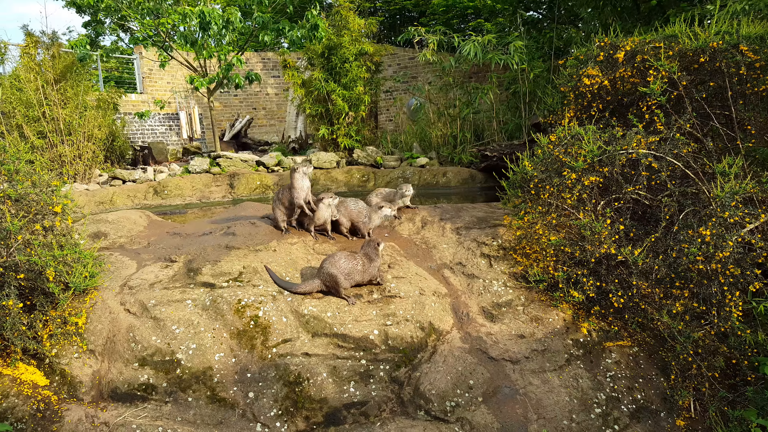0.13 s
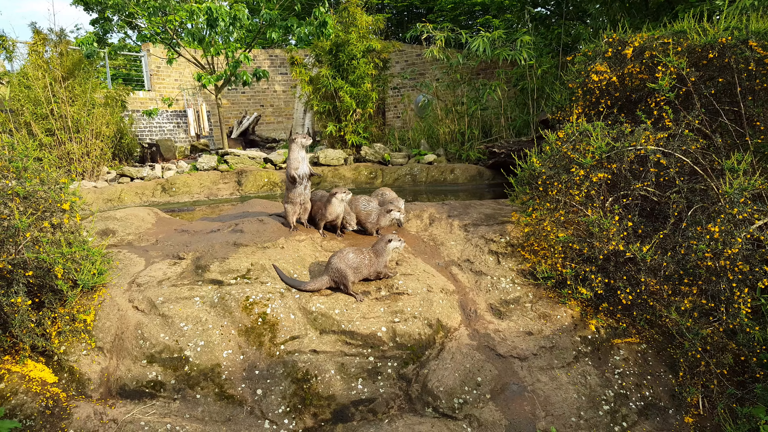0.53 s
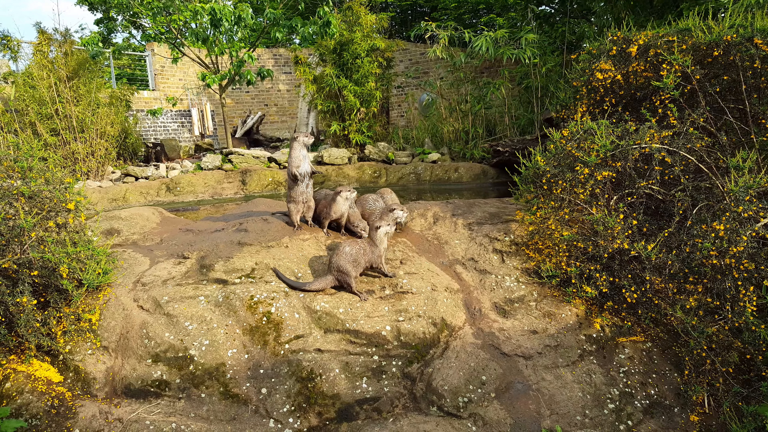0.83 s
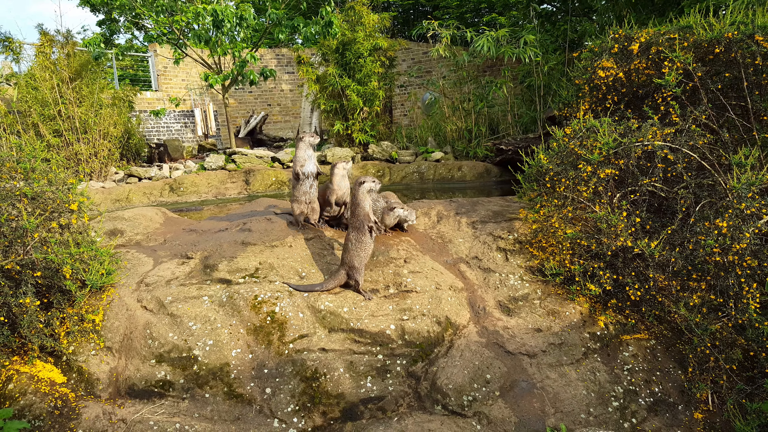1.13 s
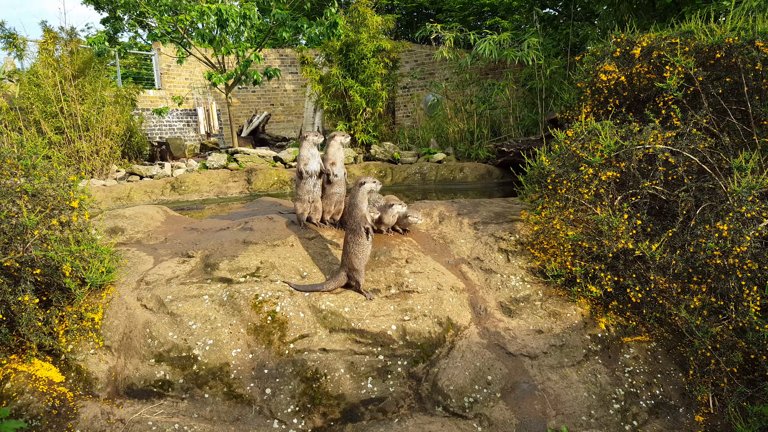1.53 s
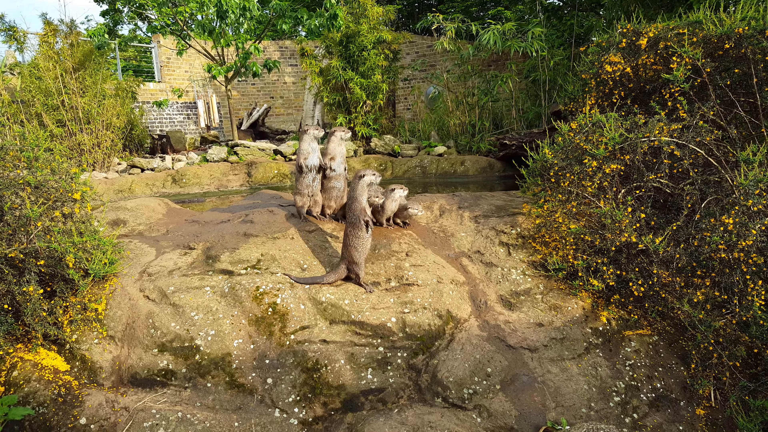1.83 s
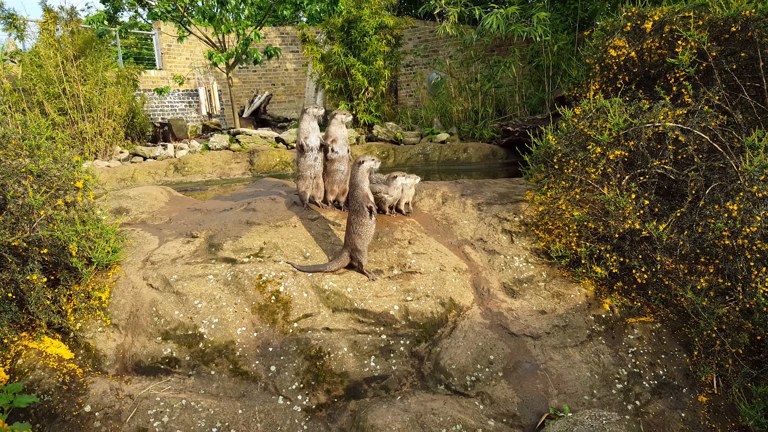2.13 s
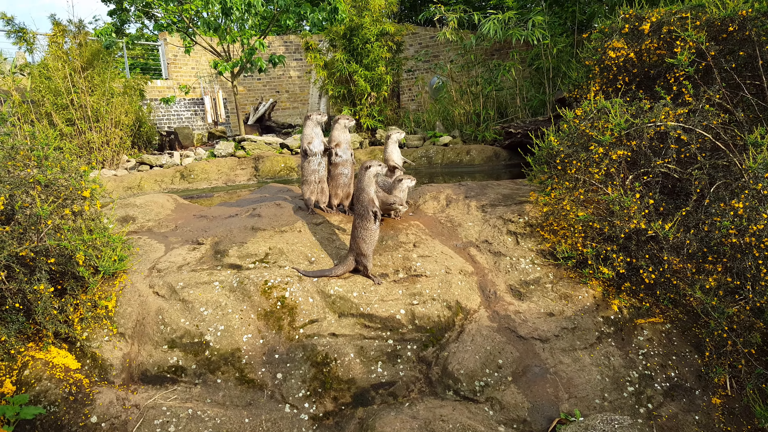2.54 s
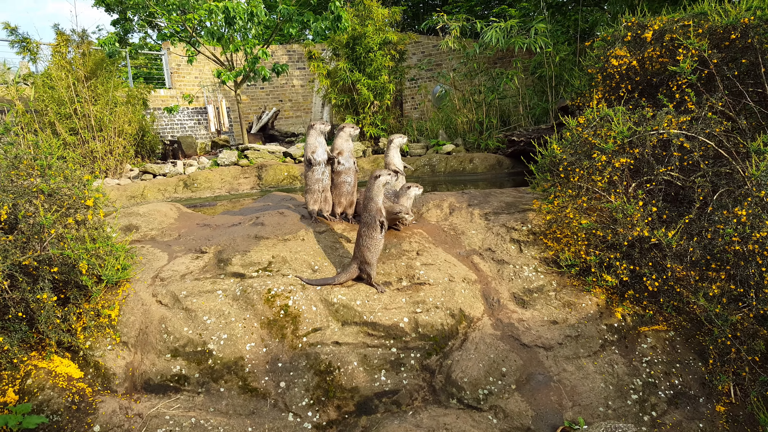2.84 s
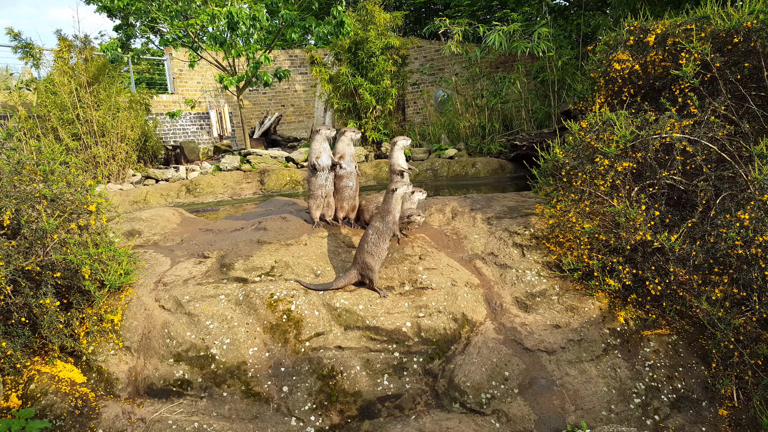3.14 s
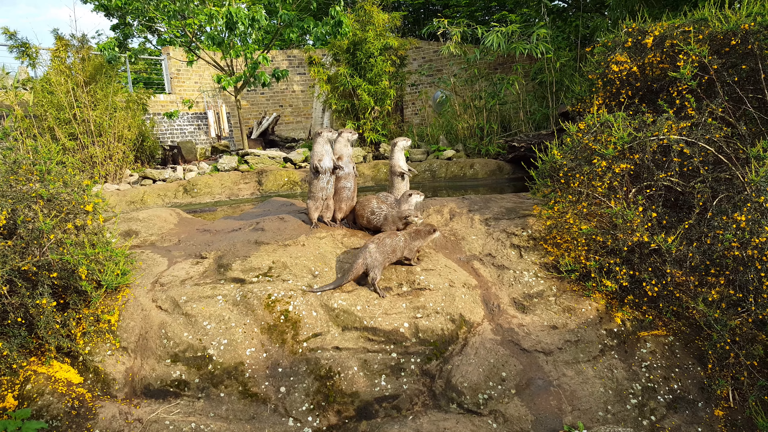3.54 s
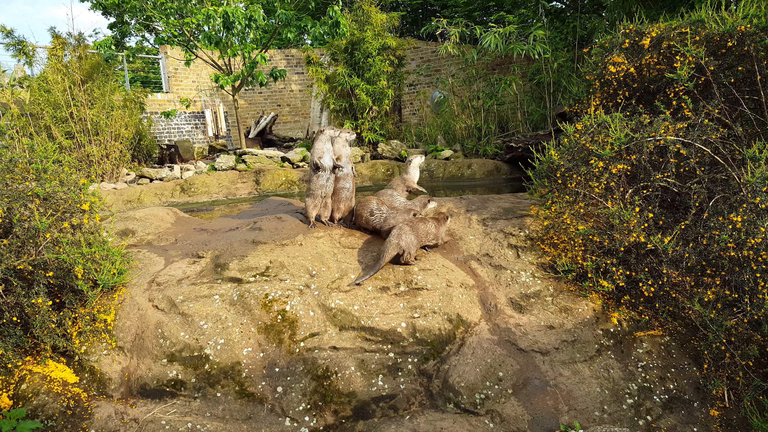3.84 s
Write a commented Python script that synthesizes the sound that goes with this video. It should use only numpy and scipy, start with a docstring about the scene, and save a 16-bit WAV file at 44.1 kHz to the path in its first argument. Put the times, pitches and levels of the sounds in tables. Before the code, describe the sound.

High-pitched otter squeaks, chirps and a sinking whine in a walled pen, with distant idling engine.

```python
"""A walled outdoor pen: a group of otters on a rock squeak, chirp, hoot and whine.
Each call is a stack of harmonics on a moving pitch, roughened by breath noise and echoed by the pen.
An engine idles somewhere off: sine orders of a slow firing rate beside a low hum.
Bands of flickering stereo noise make the outdoor rumble and hiss; all fades in from silence."""
import sys
import numpy as np
from scipy import signal
from scipy.io import wavfile
from scipy.ndimage import uniform_filter1d

SR = 44100
rng = np.random.default_rng(int(sys.argv[2]) if len(sys.argv) > 2 else 0)


def waveform_to_disk(signal):
    """Save audio, clipped to [-1, 1], as 16-bit WAV at the path in sys.argv[1]."""
    frames = np.transpose(np.atleast_2d(signal))
    scaled = np.clip(frames, -1, 1) * 32767
    samples = np.round(scaled).astype(np.int16)
    wavfile.write(sys.argv[1], SR, samples)


def voltage_ratio(level):
    """Linear amplitude factor for a level in decibels (scalar or array-like)."""
    return 10 ** (np.asarray(level, float) / 20)


N = 176400

# colour of the overtones: (frequency [Hz], gain [dB])
THROAT = [(3000, 14), (4500, -3), (6000, 1.5), (7000, -10), (9000, -2), (11000, -3), (15000, -8)]


def rms_one(x):
    """Scale to rms 1."""
    return x / np.sqrt(np.mean(x ** 2) + 1e-20)


def at_hz(points, hz):
    """Read a spectrum table, linear in dB over log frequency."""
    table_hz, value = np.transpose(points)
    return np.interp(np.log(hz), np.log(table_hz), value)


def left_right(lean_db):
    """Gains of the two sides for a left minus right level."""
    return voltage_ratio([[lean_db / 2], [-lean_db / 2]])


def drift(rate_hz):
    """Slow random drift of spread 1: noise through two equal poles at rate_hz."""
    hop = 40
    pole = np.exp(-2 * np.pi * rate_hz * hop / SR)
    noise = rng.standard_normal(N // hop + 2002)
    slow = signal.lfilter([1], [1, -2 * pole, pole * pole], noise)[2000:]   # settled part
    return np.interp(np.arange(N) / hop, np.arange(len(slow)), rms_one(slow - slow.mean()))


def smooth_columns(rows):
    """Table columns over time, corners rounded."""
    s, *columns = np.transpose(rows)
    t = np.arange(N) / SR
    return [uniform_filter1d(np.interp(t, s, column), size=260) for column in columns]


def voice(start_s, end_s, pitch_hz, partials_db, rough, rasp=0, half=0, flicker_db=3):
    """Flickering partials on a wavering pitch, shaken by breath noise; uneven cycles add half lines."""
    waver, jitter_rad, edge_s = 0.0053, 0.6, 0.001   # waver: fraction of pitch; jitter: per unit harshness
    span = slice(int(start_s * SR), min(int(end_s * SR), N))
    t, pitch_hz = (np.arange(N) / SR)[span], pitch_hz[span]
    phase = 2 * np.pi * np.cumsum(pitch_hz * (1 + waver * drift(29.4)[span])) / SR

    breath = rms_one(uniform_filter1d(rng.standard_normal(len(t)), size=24))
    first_db = partials_db[0][span]
    effort = voltage_ratio(first_db - first_db.max())
    harsh = rough * effort + rasp * ((t - start_s) / (end_s - start_s)) ** 7   # rasp grows late
    phase = phase + jitter_rad * harsh * breath[::-1]
    shake = 1 + harsh * breath + half * effort * np.cos(phase / 2)

    slow = signal.butter(2, 40, fs=SR, output="sos")
    flicker = rms_one(signal.sosfilt(slow, rng.standard_normal((len(partials_db), len(t)))))
    tone = 0
    for k, db in enumerate(partials_db):
        gain = voltage_ratio(db[span] + flicker_db * flicker[k] * (k > 1))   # first two partials are steady
        audible = (k + 1) * pitch_hz < .45 * SR
        tone = tone + gain * np.sin((k + 1) * phase) * audible

    edges = np.clip(np.minimum(t - start_s, end_s - t) / edge_s, 0, 1)
    out = np.zeros(N)
    out[span] = np.sqrt(2) * tone * shake * edges
    return out


def squeaks():
    """Short stacks of six partials on quick pitch arches and falls, each placed in level and lag."""
    # one list per squeak: (time [s], pitch [Hz], first partial [dB])
    paths = [
        [(.965, 2213, -44.5), (.985, 2866, -46.5), (.998, 2964, -34), (1.02, 2900, -35), (1.047, 2360, -31),
         (1.063, 1805, -57)],
        [(1.183, 2220, -68), (1.195, 2307, -36.5), (1.222, 2046, -38), (1.265, 2296, -39.5),
         (1.295, 2242, -37.5), (1.312, 2240, -61)],
        [(2.156, 2340, -40.5), (2.18, 2920, -37), (2.2, 3026, -22.5), (2.209, 2945, -20.5),
         (2.218, 2387, -26.5), (2.234, 1520, -51.5)],
        [(2.998, 2046, -55), (3.016, 2310, -39), (3.03, 2290, -44.5), (3.05, 1860, -46)],
        [(3.058, 2100, -51), (3.095, 2346, -34.5), (3.115, 2245, -41), (3.135, 2070, -51)],
        [(3.214, 2402, -36), (3.228, 3000, -38), (3.24, 3323, -15), (3.256, 3200, -28.5), (3.285, 3140, -24.5),
         (3.298, 2860, -29), (3.311, 2477, -19), (3.321, 1746, -33), (3.336, 1426, -51)],
        [(3.333, 2984, -28.5), (3.36, 2753, -33.5), (3.39, 2150, -37), (3.43, 1900, -46), (3.465, 2030, -37),
         (3.505, 1895, -53)],
        [(3.74, 1527, -49), (3.762, 2233, -35), (3.778, 2310, -24.5), (3.79, 2120, -34), (3.806, 1610, -51)],
        [(3.815, 1707, -53), (3.835, 2163, -34), (3.848, 2188, -33.5), (3.86, 2206, -30), (3.878, 1850, -57)],
        [(3.885, 1300, -49), (3.9, 1150, -44), (3.928, 1075, -59)],
    ]
    # per squeak: (second partial over first [dB], change per further partial [dB], roughness [0-1],
    #              left minus right [dB], left lag [ms])
    colours = [(-2, -8, 0.02, 2, .01), (-16.5, -1.5, 0, 0.8, .03), (-7, -5, 0.04, 1, .02),
               (-13.5, -1.5, 0.36, 2, -0.019), (-9.5, -4.5, 0.2, 2.5, -0.11), (-9.5, -5, 0.04, 2, .02),
               (-13, -6, 0.61, 3.5, -0.094), (-7.5, -2, 0.09, 1, -.05), (-11.5, -1.5, 0.28, -0.5, -.05),
               (-20, 3, 0.1, 3, 0)]
    end_rasp = 0.45
    out = np.zeros((2, N))
    for path, (second_db, further_db, rough, lean_db, lag_ms) in zip(paths, colours):
        pitch_hz, first_db = smooth_columns(path)
        stack = [first_db]
        for k in range(5):
            throat_db = at_hz(THROAT, (k + 2) * pitch_hz)
            stack.append(first_db + second_db + further_db * k + throat_db)
        half = 1.3 * max(rough - .15, 0)   # only rough squeaks have half lines
        call = voice(path[0][0], path[-1][0], pitch_hz, stack, rough, end_rasp, half)
        late = np.roll(call, int(lag_ms * SR / 1000))
        out += np.array([late, call]) * left_right(lean_db)
    return out


def whine():
    """A long sinking stack, led by its second and fourth partials, later by its first."""
    # (time [s], pitch [Hz], first partial [dB], second partial [dB], fourth partial [dB])
    path = [(3.54, 956, -51, -64, -59), (3.58, 953, -57, -47, -50), (3.625, 927, -56, -48, -53),
            (3.68, 953, -58, -45, -44.5), (3.745, 917, -47.5, -43, -46), (3.785, 808, -48.5, -44, -56),
            (3.815, 746, -43, -83, -52), (3.885, 742, -44.5, -75, -53), (3.91, 702, -43, -77, -58),
            (4, 689, -43, -74, -50)]
    weak_db, loss_db = -8, -1.2   # third and upper partials re fourth; change per upper partial
    pitch_hz, first_db, second_db, fourth_db = smooth_columns(path)
    stack = [first_db, second_db, fourth_db + weak_db, fourth_db]
    for k in range(8):
        throat_db = at_hz(THROAT, (k + 5) * pitch_hz)
        stack.append(fourth_db + weak_db + loss_db * k + throat_db)
    call = voice(path[0][0], path[-1][0] + .01, pitch_hz, stack, rough=.15, flicker_db=3.5)
    return call * left_right(2.5)


def hoot():
    """One soft, nearly plain tone, dying away."""
    start_s, length_s, pitch_hz = .372, .07, 745
    start_db, fall_db_per_s = -24.5, 235
    level_db = start_db - fall_db_per_s * (np.arange(N) / SR - start_s)
    return voice(start_s, start_s + length_s, np.full(N, pitch_hz), [level_db], rough=0.077)


def pen(x):
    """Quick scatter off the rock and a diffuse tail: decaying noise, different on each side."""
    t, response = np.arange(SR // 2) / SR, 0
    for t60_s, db in ((.1, -8), (.5, -14)):   # scatter, tail
        tail = rng.standard_normal((2, len(t))) * voltage_ratio(-60 * t / t60_s) * (t > .001)
        response = response + tail * voltage_ratio(db) / np.sqrt(np.sum(tail ** 2, axis=1, keepdims=True))
    return signal.fftconvolve(x, response, axes=1)[:, :N]


def engine():
    """Flickering sine orders of a slow, wavering firing rate; a hum beats with the third order."""
    # (order of the firing rate, level [dB rms])
    orders = [(3, -57.5), (5, -41.5), (6, -43), (7, -43), (8, -49.5), (9, -51), (14, -55.5)]
    firing_hz, waver, flicker_db = 18.55, 0.00616, 1.5
    hum_hz, hum_db = 52.4, -46.5
    phase = 2 * np.pi * np.cumsum(firing_hz * (1 + waver * drift(0.89))) / SR
    hum_phase = 2 * np.pi * hum_hz * np.arange(N) / SR
    out = voltage_ratio(hum_db) * np.sin(hum_phase + rng.uniform(0, 2 * np.pi))
    for order, db in orders:
        gain = voltage_ratio(db + flicker_db * drift(3.5))
        out = out + gain * np.sin(order * phase + rng.uniform(0, 2 * np.pi))
    return np.sqrt(2) * out


def air():
    """Bands of stereo noise 0.4 octave wide, each with its own level, flicker, lean and likeness."""
    # noise spectrum: (frequency [Hz], relative density [dB per Hz])
    spectrum = [(25, -22), (38, -17), (66, -11.5), (107, -4), (188, -10), (267, -12), (359, -18),
                (1540, -20.5), (3640, -34), (11600, -49), (15600, -50)]
    # hiss above 1 kHz: (time [s], gain [dB])
    treble = [(0, -1.5), (3.6, 0), (4, 2.5)]
    # (frequency [Hz], left-right correlation)
    likeness = [(60, 0.8), (180, 1), (550, 0.53), (1650, -0.51), (4970, 0.098)]
    # (frequency [Hz], left minus right [dB])
    lean = [(60, 1), (2380, 0.5), (15000, -5)]
    level_db, patchy_db = -37.5, 0.69
    edges_hz = 25 * 2 ** np.arange(0, 9.5, .4)
    white = rng.standard_normal((2, 2, N))   # neighbouring bands draw on different noise
    together = drift(1.5)
    treble_db, = smooth_columns(treble)
    out = 0
    for k, (low, high) in enumerate(zip(edges_hz, edges_hz[1:])):
        band = signal.butter(2, [low, high], "band", fs=SR, output="sos")
        mid, side = signal.sosfilt(band, white[k % 2])
        hz = np.sqrt(low * high)
        alike = np.clip(at_hz(likeness, hz), -1, 1)
        flicker_db = patchy_db * (0.22 * together + drift(9.3))
        gain = voltage_ratio(at_hz(spectrum, hz) + flicker_db + treble_db * (hz > 1000))
        pair = np.sqrt(1 + alike) * mid + np.sqrt(1 - alike) * side * [[1], [-1]]
        out = out + gain * pair * left_right(at_hz(lean, hz))
    return voltage_ratio(level_db) * rms_one(out)


def scene():
    """Otters in their pen, duller on the left, over engine and air."""
    otters = squeaks() + whine() + hoot()
    otters = otters + pen(otters)
    left_dulling = signal.butter(1, 6500, fs=SR, output="sos")
    otters[0] = signal.sosfilt(left_dulling, otters[0])
    return otters + engine() + air()


def band_limit(x):
    """A steep low-pass at the top of the band."""
    return signal.sosfilt(signal.butter(12, 15710, fs=SR, output="sos"), x)


def record(dry):
    """Cut the top steeply and fade in from silence."""
    fade_start_s, fade_s = .37, .77
    fade = np.clip((np.arange(N) / SR - fade_start_s) / fade_s, 0, 1) ** 0.93
    top_cut = signal.cheby2(10, 50, 16200, fs=SR, output="sos")
    mix = signal.sosfilt(top_cut, dry) * fade
    return band_limit(mix)


dry = scene()
out = record(dry)
waveform_to_disk(out)
```